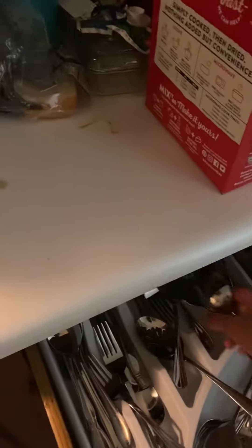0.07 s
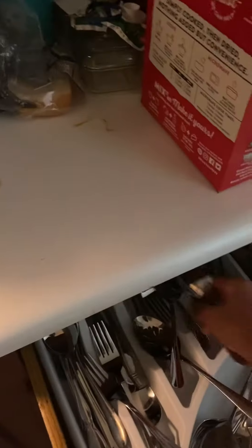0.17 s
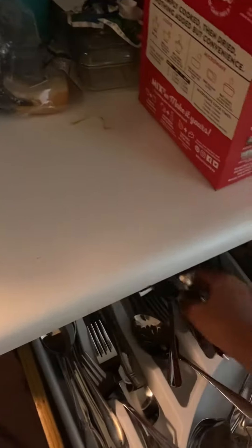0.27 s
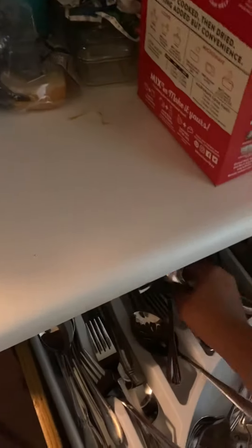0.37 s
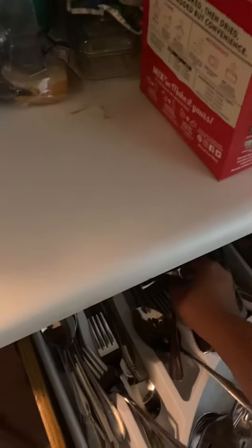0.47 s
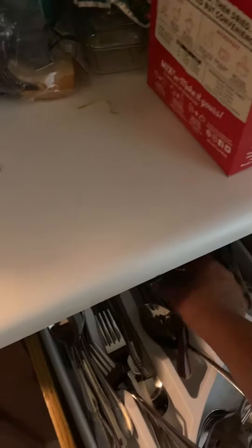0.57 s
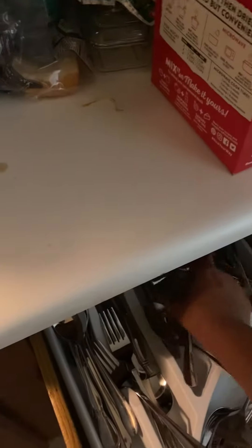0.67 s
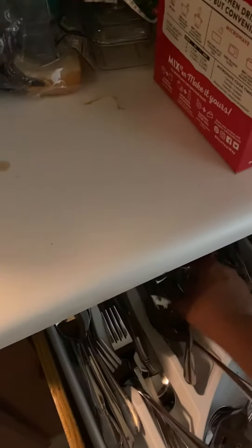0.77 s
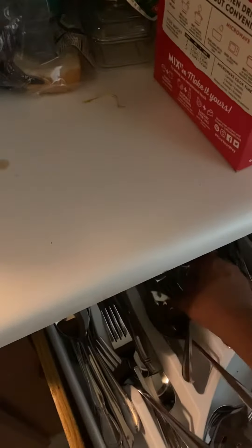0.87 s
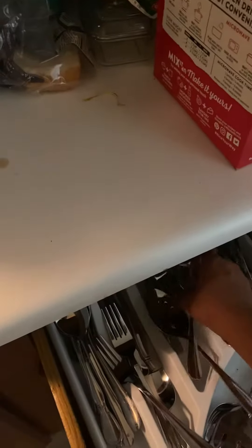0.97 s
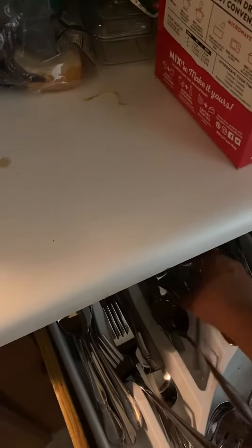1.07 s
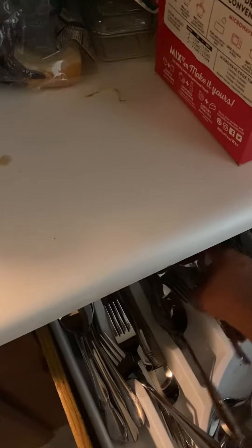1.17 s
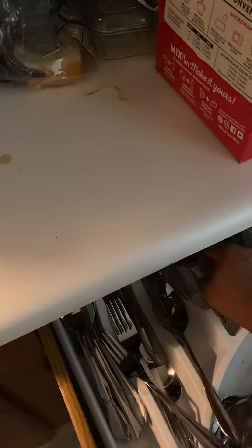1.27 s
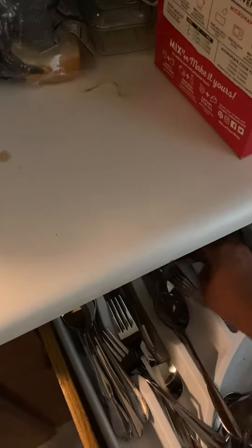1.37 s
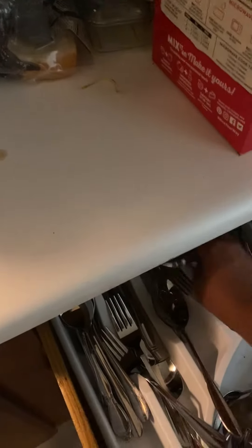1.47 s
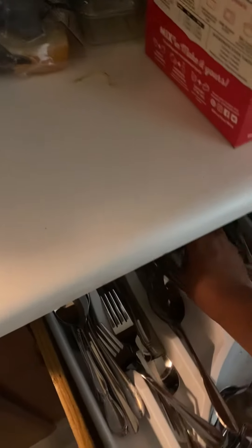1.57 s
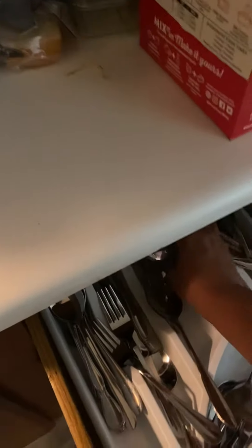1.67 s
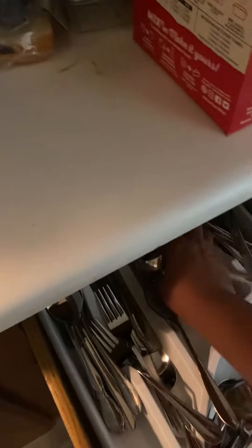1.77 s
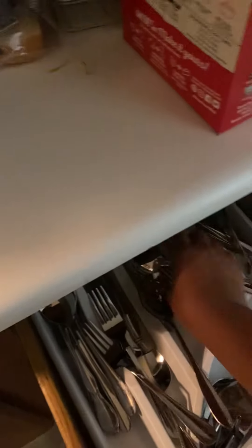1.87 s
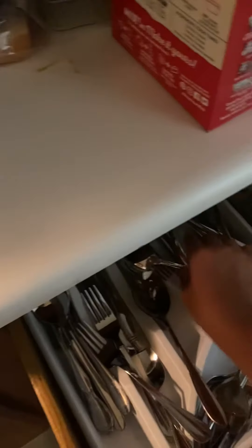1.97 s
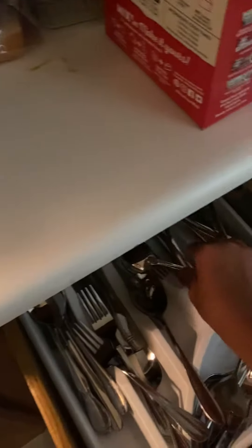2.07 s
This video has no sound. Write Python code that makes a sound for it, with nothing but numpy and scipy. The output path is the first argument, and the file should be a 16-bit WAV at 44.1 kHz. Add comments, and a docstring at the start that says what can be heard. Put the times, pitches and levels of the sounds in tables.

```python
"""A hand lays steel cutlery into the plastic tray of a kitchen drawer, close to a phone.
Faint sliding comes first, then near 0.25 s a hard burst of clinks and knocks with single clear tones.
Looser chatter and sliding follow, crowd up from 1.3 s to 1.8 s, then drop to soft last touches near 2.1 s.
Clustered tiny contacts drive resonances for steel and tray; damped sines add clear tones and thumps.
From start to end a wavering sine hum of an appliance and shaped noise fill the small kitchen."""
import sys
import numpy as np
from scipy import signal
from scipy.fft import rfft, irfft, next_fast_len
from scipy.io import wavfile
from scipy.ndimage import map_coordinates

SR = 44100
rng = np.random.default_rng(int(sys.argv[2]) if len(sys.argv) > 2 else 0)


def master(y):
    """Save y as 16-bit WAV."""
    cut = np.clip(np.atleast_2d(y).T, -1, 1)
    pcm = np.round(cut * 32767)  # scale
    wavfile.write(sys.argv[1], SR, pcm.astype(np.int16))


def volts_from_decibels(level):
    """Turn decibel levels (scalar or array-like) into linear amplitude factors."""
    exponent = np.asarray(level, float) / 20
    return 10 ** exponent


N = 94815  # length in samples

# steel on steel, levels before the layer gains: start_s, level_db, pitch_hz, chatter_t60_s
CLINKS = [(0.0085, -32, 5360, 0.075), (0.2205, -20, 5920, 0.12), (0.2479, -6, 3786, 0.087),
          (0.261, -0.5, 5830, 0.11), (0.2784, -2, 3840, 0.045), (0.2924, -7.5, 6540, 0.14),
          (0.32, -10.5, 3930, 0.057), (0.4174, -15.5, 5090, 0.062), (0.4578, -16.5, 7680, 0.066),
          (0.5212, -11.5, 5960, 0.2), (0.5792, -15, 6890, 0.12), (0.6255, -19.5, 6080, 0.22),
          (0.6449, -17.5, 5180, 0.08), (0.696, -20, 7840, 0.26), (0.7915, -22, 6250, 0.15),
          (0.8384, -24.5, 5840, 0.24), (0.8599, -11, 6620, 0.17), (0.881, -19.5, 6450, 0.2),
          (0.998, -14.5, 5510, 0.12), (1.0928, -20.5, 3920, 0.11), (1.1333, -13.5, 6380, 0.089),
          (1.1508, -10, 5430, 0.1), (1.1833, -13.5, 3760, 0.075), (1.3017, -7.5, 6030, 0.053),
          (1.318, -9.5, 6030, 0.096), (1.3838, -16.5, 5670, 0.24), (1.408, -22.5, 5050, 0.19),
          (1.4383, -15.5, 5600, 0.062), (1.467, -15, 5520, 0.072), (1.504, -12, 6370, 0.25),
          (1.5478, -14, 6200, 0.039), (1.555, -9, 3240, 0.16), (1.6097, -20, 7100, 0.069),
          (1.6589, -23, 3670, 0.46), (1.6812, -12, 5340, 0.13), (1.7015, -8.5, 5840, 0.24),
          (1.741, -7.5, 4200, 0.2), (1.7902, -8.5, 7030, 0.18), (1.8059, -2.5, 5830, 0.13),
          (2.0101, -40.5, 3730, 0.099), (2.0998, -29.5, 3620, 0.25), (2.1237, -17, 3740, 0.017)]
# steel on the tray, levels before the layer gains: start_s, level_db, pitch_hz, rattle_t60_s
KNOCKS = [(0.25, -13.5, 1690, 0.024), (0.267, -13.5, 1070, 0.052), (0.291, -19.5, 1870, 0.22),
          (0.344, -17.5, 790, 0.086), (0.413, -16, 765, 0.052), (0.458, -26, 1110, 0.21),
          (0.524, -22, 1480, 0.27), (0.587, -23.5, 1580, 0.078), (0.628, -23.5, 1880, 0.17),
          (0.647, -24, 1480, 0.2), (0.695, -18.5, 1800, 0.11), (0.797, -21, 1070, 0.054),
          (0.867, -13, 996, 0.1), (0.997, -28, 1110, 0.11), (1.16, -26.5, 770, 0.23),
          (1.278, -31.5, 1630, 0.026), (1.303, -17, 826, 0.13), (1.389, -20, 1550, 0.069),
          (1.423, -21, 1640, 0.034), (1.467, -21, 1435, 0.048), (1.508, -23, 970, 0.2),
          (1.557, -11, 1780, 0.073), (1.582, -15, 640, 0.045), (1.654, -17, 1110, 0.2),
          (1.684, -19.5, 1610, 0.16), (1.707, -15.5, 1170, 0.13), (1.742, -12, 932, 0.077),
          (1.759, -17, 648, 0.12), (1.792, -17, 580, 0.18), (1.809, -11, 1170, 0.079),
          (1.901, -32.5, 1320, 0.076), (2.117, -25, 1050, 0.071)]
# single clear tones of a piece or the tray, some short, some ringing on: start_s, level_db, pitch_hz, t60_s
CLEAR_TONES = [(.25, -25.5, 3783, 0.17), (.25, -25, 3825, 0.17), (.882, -24.5, 6470, 0.36),
               (.265, -23, 5690, 0.2), (.415, -27, 720, 0.054), (.924, -18.5, 1800, 0.025),
               (1.07, -33, 735, 0.15), (1.132, -32, 680, 0.1), (1.153, -26.5, 3750, 0.083),
               (1.744, -24, 4202, 0.21), (1.809, -28, 5675, 0.27), (2.074, -29.5, 591, 0.051)]
# sliding levels, joined by straight lines: time_s, steel_db, tray_db
SLIDING = [(0, -49, -71), (.05, -56.5, -64), (0.107, -42, -63), (0.198, -51.5, -82), (0.226, -30, -67),
           (.4, -45.5, -60), (0.781, -68.5, -45), (1.08, -45.5, -38.5), (1.249, -46.5, -43.5),
           (1.7, -42, -36), (1.9, -46.5, -55.5), (2.072, -88, -55.5), (2.15, -55, -37.5)]
# shared modes of the cutlery heap: pitch_hz, relative_level_db
STEEL_MODES = [(2930, -2.5), (3640, 0), (3800, 2), (4300, -3.5), (4950, 5), (5450, 2.5), (5680, 4.5),
               (6050, 1), (6470, 8.5), (6690, 8.5), (7560, 6), (8050, 2.5), (8980, 3), (9950, 2)]
# resonances of the plastic tray: pitch_hz, width_hz, relative_level_db
TRAY_MODES = [(718, 123, 15.5), (1110, 128, 4.5), (871, 190, 7), (1630, 576, 13)]
# broadband colour of a steel contact: frequency_hz, relative_level_db
CRACK_COLOUR = [(1100, -29.5), (2100, -7.5), (4800, -2), (6700, -18), (10000, -20.5), (12000, -3),
                (15800, -35)]
# colour of the drawer's low thud: frequency_hz, relative_level_db
DRAWER_COLOUR = [(35, -14), (70, 6.5), (450, 12.5), (650, -54)]
# colour of the room air: frequency_hz, relative_level_db
AIR_COLOUR = [(30, -9), (60, -5.5), (200, -2), (400, -10), (1500, -27), (11000, -50)]
# appliance partials, sine peak around which the level wavers: pitch_hz, level_db
HUM_PARTIALS = [(60, -56), (118, -55)]
# reverberation of the kitchen: frequency_hz, t60_s
KITCHEN_DECAY = [(500, 0.2), (9000, 0.057)]
# balance of the two ports: frequency_hz, left_minus_right_db
PORT_TILT = [(60, 0), (600, -3), (2400, -.6), (9000, 0)]
# phase by which the left port leads: frequency_hz, lead_rad
PORT_LEAD = [(60, 0), (500, -.35), (1000, 0), (2200, .7), (4200, -.3), (4500, -2.2), (5000, -2.3),
             (5350, .3), (10300, 2.3), (10600, 3.0)]
# gain of the sound added in opposite polarity to the ports: frequency_hz, gain_db
APART_GAIN = [(100, -25), (1900, -11.5), (2500, -3), (3600, -1.5), (5500, -20.5)]

ATTACK_S = 0.0011  # rise time constant of a struck tone
RISE = 0.018  # a chatter builds with a time constant of this share of its t60
CLINK_DB, KNOCK_DB = -13, -6.5  # chatter gains of clinks and knocks


def unit(x):
    """Scale a signal to rms 1."""
    return x / np.sqrt(np.mean(x ** 2) + 1e-20)


def along(points, hz):
    """Read a (frequency_hz, value) curve on a log frequency axis."""
    point_hz, value = np.transpose(points)
    return np.interp(np.log(hz + 1), np.log(point_hz + 1), value)


def filtered(x, response):
    """Multiply the spectrum of x by a complex response of frequency."""
    size = next_fast_len(N + SR // 2)
    return irfft(rfft(x, size) * response(np.fft.rfftfreq(size, 1 / SR)), size)[..., :N]


def coloured(x, colour):
    """Shape x by a dB curve, without phase shift."""
    return filtered(x, lambda f: volts_from_decibels(along(colour, f)))


def body(modes):
    """Causal response of an object: damped resonances of alternating sign, (pitch_hz, width_hz, level_db)."""
    def response(f):
        total = 0
        for k, (hz, width, db) in enumerate(modes):
            damping = 1j * f * width
            total = total + (-1) ** k * volts_from_decibels(db) * damping / (hz * hz - f * f + damping)
        return total
    return response


def contacts():
    """Dense tiny random impacts of uneven size, swelling and thinning in clumps; rms 1."""
    contacts_per_s, clumps_per_s, clump_db = 9000, 120, 2
    t = np.arange(N) / SR
    clump = map_coordinates(rng.standard_normal(N // 100), [t * clumps_per_s])
    struck = rng.random(N) < contacts_per_s / SR
    return unit(struck * rng.standard_normal(N) * volts_from_decibels(clump_db * clump))


def fading(s, db, t60, rise_s):
    """Envelope of a blow: quick rise at s, then an exponential fall with a t60 of at least 10 ms."""
    t = np.clip(np.arange(N) / SR - s, 0, None)
    return volts_from_decibels(db - 60 * t / max(t60, .01)) * (1 - np.exp(-t / rise_s))


def tone(s, db, hz, t60):
    """A single struck mode: a damped sine."""
    return fading(s, db, t60, ATTACK_S) * np.sin(2 * np.pi * hz * (np.arange(N) / SR - s))


def effort(events, gain_db, column):
    """How hard contacts are driven: the powers of sliding and of each blow's chatter add up."""
    rows = np.array(SLIDING)
    slide = volts_from_decibels(np.interp(np.arange(N) / SR, rows[:, 0], rows[:, column]))
    power = slide ** 2
    for s, db, _, t60 in events:
        power = power + fading(s, db + gain_db, t60, RISE * t60) ** 2
    return np.sqrt(power)


def driven(drive, response):
    """Contacts shaped by the drive, ringing a body scaled to unit power gain."""
    hits = contacts()
    return filtered(drive * hits, response) / np.std(filtered(hits, response))


def ringing_heap():
    """Sliding and clinks excite the heap's modes; each clink shifts them and favours its own pitch."""
    width_hz = 125
    shift, scatter_db = .02, 3  # other pieces meet at each clink: spread of mode pitch (share) and level
    favour_db, favour_width_hz = 0.5, 230
    modes = body([(hz, width_hz, db) for hz, db in STEEL_MODES])
    heap = driven(effort([], CLINK_DB, column=1), modes)  # sliding alone
    hits = contacts()
    scale = np.std(filtered(hits, modes))
    for k, (s, db, hz, t60) in enumerate(CLINKS):
        chance = rng.standard_normal((len(STEEL_MODES), 2))
        pieces = body([(mode_hz * (1 + shift * a), width_hz, mode_db + scatter_db * b)
                       for (mode_hz, mode_db), (a, b) in zip(STEEL_MODES, chance)])
        favour = body([(hz, favour_width_hz, favour_db)])
        own_hits = np.roll(hits, k * SR // 20)  # a different stretch of contacts for each clink
        chatter = fading(s, db + CLINK_DB, t60, RISE * t60) * own_hits
        heap = heap + filtered(chatter, lambda f: pieces(f) * (1 + favour(f))) / scale
    return heap


def steel_crack():
    """Broadband clatter of steel contacts, with a sharp tick as each clink first touches."""
    crack_db, tick_db, tick_t60_s = -6, -2, .025
    ticks = sum(fading(s, db + CLINK_DB + tick_db, tick_t60_s, ATTACK_S / 2) for s, db, _, _ in CLINKS)
    drive = effort(CLINKS, CLINK_DB, column=1) + ticks
    return volts_from_decibels(crack_db) * drive * unit(coloured(contacts(), CRACK_COLOUR))


def cutlery():
    """Contacts ring the heap and crack; damped sines add a short tone per clink and single clear tones."""
    tone_db, tone_t60_s = -9, 0.03
    clink_tones = sum(tone(s, db + tone_db, hz, tone_t60_s) for s, db, hz, _ in CLINKS)
    clear_tones = sum(tone(*row) for row in CLEAR_TONES)
    return ringing_heap() + steel_crack() + clink_tones + clear_tones


def tray():
    """Steel on plastic: rattle in the tray's modes and at each knock's pitch, thumps and a drawer thud."""
    thump_db, thump_q, thud_db = 8, 4.4, -15
    focus_db, focus_width_hz = 9.5, 41  # extra rattle at each knock's own pitch
    drive = effort(KNOCKS, KNOCK_DB, column=2)
    rattle = driven(drive, body(TRAY_MODES))
    thud = driven(drive, lambda f: volts_from_decibels(along(DRAWER_COLOUR, f)))
    hits = contacts()
    focus, thumps = 0, 0
    for s, db, hz, t60 in KNOCKS:
        chatter = fading(s, db + KNOCK_DB + focus_db, t60, RISE * t60) * hits
        focus = focus + filtered(chatter, body([(hz, focus_width_hz, 0)]))
        thump_t60 = np.log(1000) * thump_q / np.pi / hz
        thumps = thumps + tone(s, db + thump_db, hz, thump_t60)
    return rattle + focus + thumps + volts_from_decibels(thud_db) * thud


def kitchen(x):
    """Small-room reverberation: two decaying noise tails, drawn anew for every 0.1 s of sound."""
    delay, step = 130, SR // 10  # samples
    out = np.zeros((2, N + SR))
    for a in range(0, N, step):
        hz, t, z = signal.stft(rng.standard_normal((2, SR // 3)), SR, nperseg=256)
        decay = volts_from_decibels(-60 * t / along(KITCHEN_DECAY, hz)[:, None])
        tail = signal.istft(z * decay, SR, nperseg=256)[1]
        wet = signal.fftconvolve(x[None, a:a + step], tail / np.linalg.norm(tail[0]), axes=1)
        out[:, a + delay:a + delay + wet.shape[1]] += wet
    return out[:, :N]


def appliance():
    """Low hum: sine partials whose level and phase waver slowly and at random."""
    t = np.arange(N) / SR

    def waver():
        return map_coordinates(rng.standard_normal(30), [t * 9])  # 9 random points a second

    return sum(volts_from_decibels(db + 3 * waver()) * np.sin(2 * np.pi * hz * t + 2.2 * waver())
               for hz, db in HUM_PARTIALS)


def room_air():
    """Steady noise floor of the room, mostly low frequencies."""
    return volts_from_decibels(-54) * unit(coloured(rng.standard_normal(N), AIR_COLOUR))


def scene():
    """Two ports hear one sound with their own balance and phase; some room sound differs between them."""
    room_db = -9.5
    near = cutlery() + tray()
    shared_tail, apart_tail = kitchen(near)
    background = appliance() + room_air()
    half = np.array([[.5], [-.5]])  # split the port difference evenly between left and right

    def port_response(hz):
        return volts_from_decibels(along(PORT_TILT, hz) * half) * np.exp(1j * along(PORT_LEAD, hz) * half)

    ports = filtered(near + volts_from_decibels(room_db) * shared_tail + background, port_response)
    # rolling the background by 1/7 s makes its side part unlike its middle part
    apart = coloured(apart_tail + np.roll(background, SR // 7), APART_GAIN)
    return ports + apart * [[1], [-1]]


def low_pass(x):
    """Removes everything above the highest recorded frequency."""
    return signal.sosfilt(signal.butter(12, 15760, fs=SR, output="sos"), x)


def record(dry):
    """The finished mix as the phone delivers it."""
    return low_pass(dry)


dry = scene()
out = record(dry)
master(out)
```